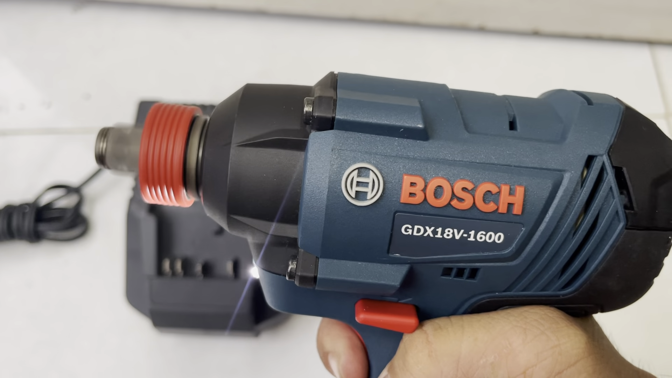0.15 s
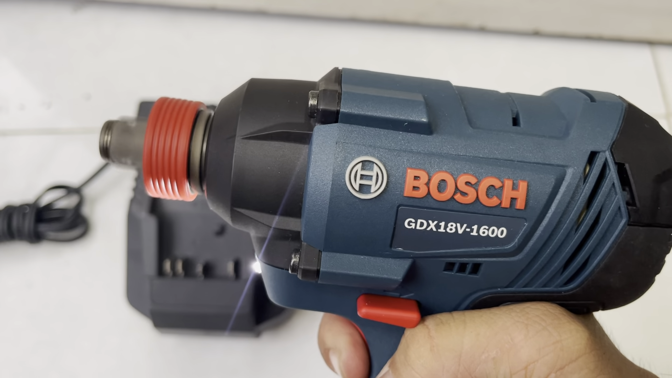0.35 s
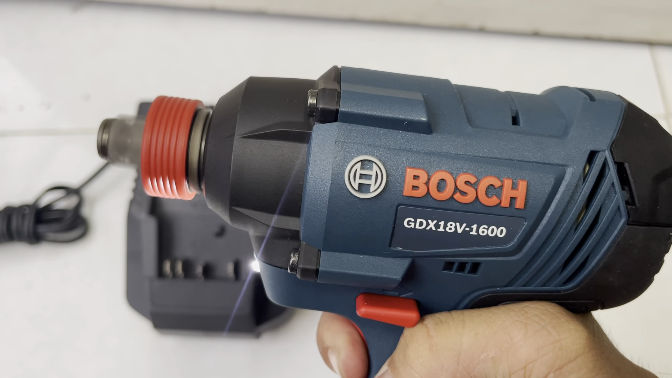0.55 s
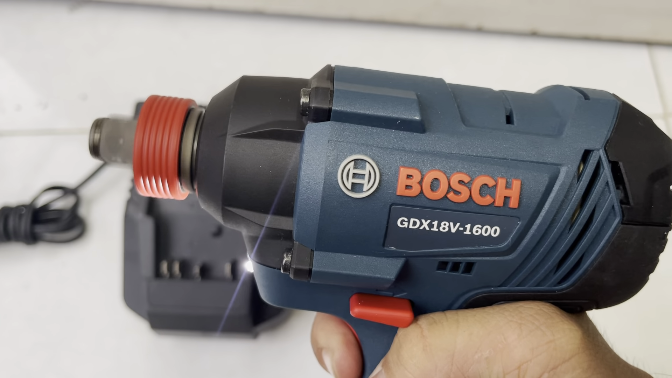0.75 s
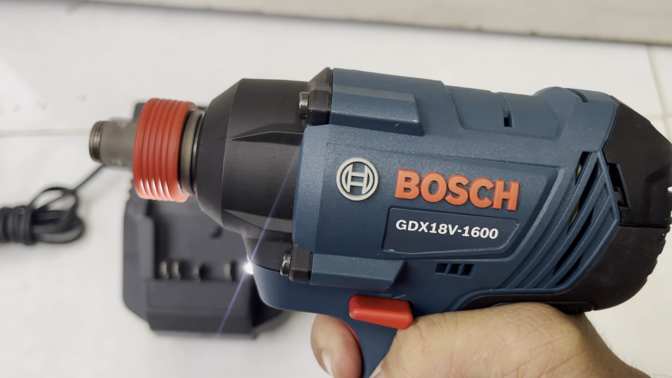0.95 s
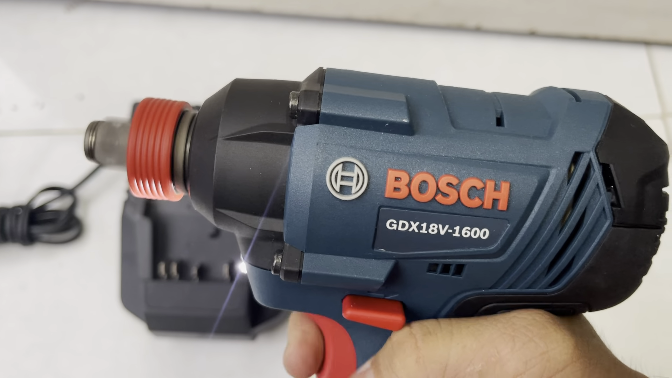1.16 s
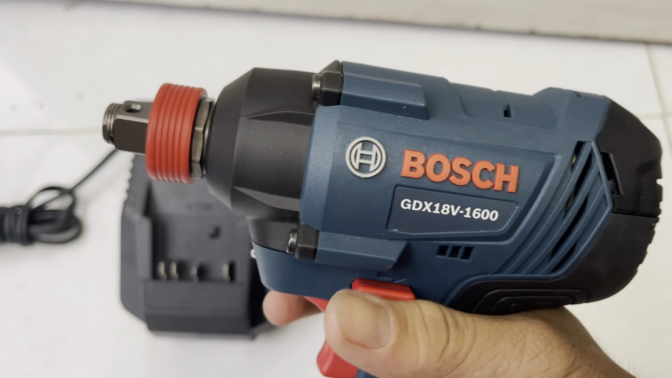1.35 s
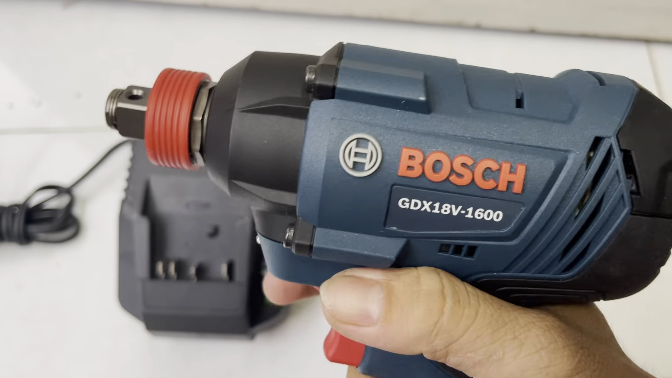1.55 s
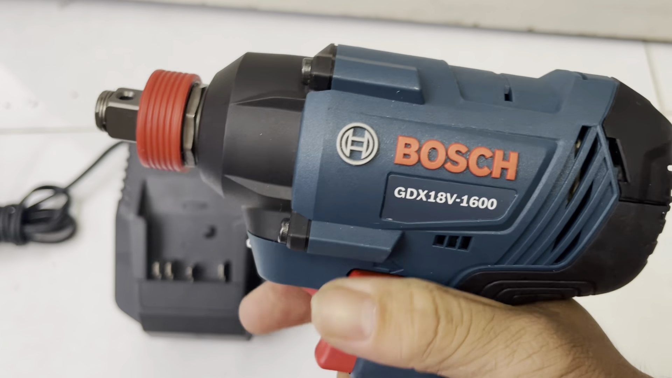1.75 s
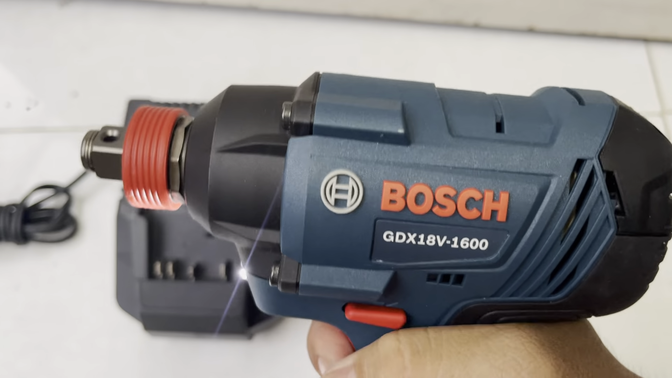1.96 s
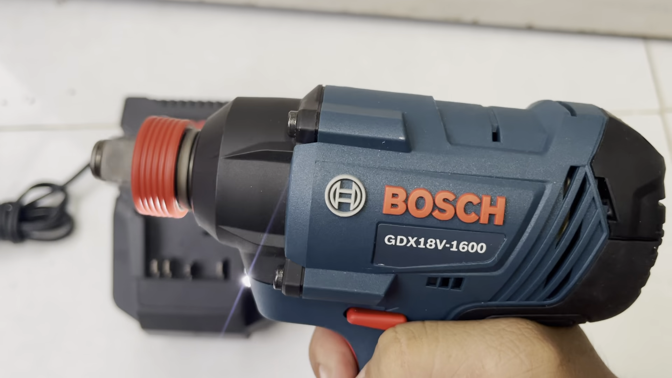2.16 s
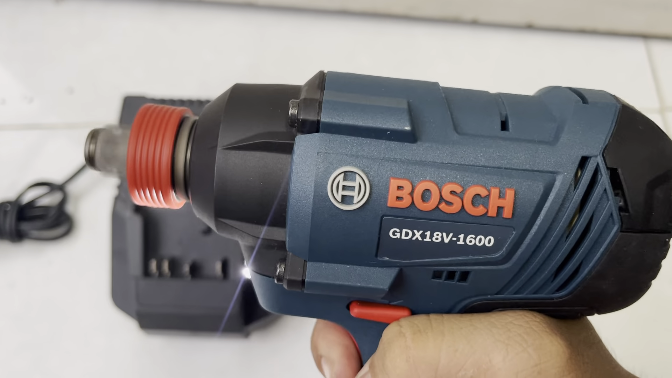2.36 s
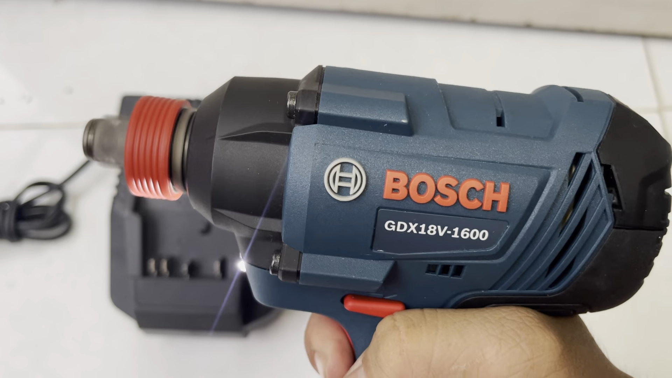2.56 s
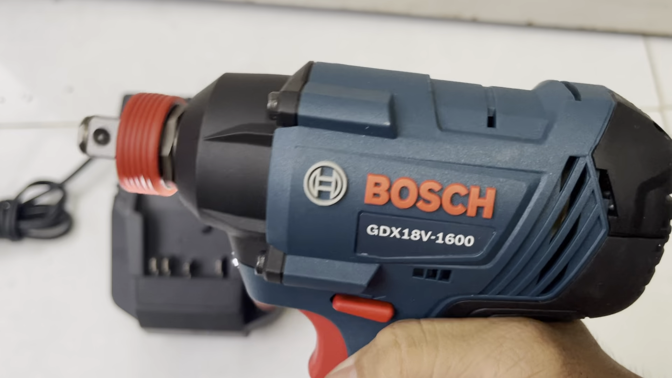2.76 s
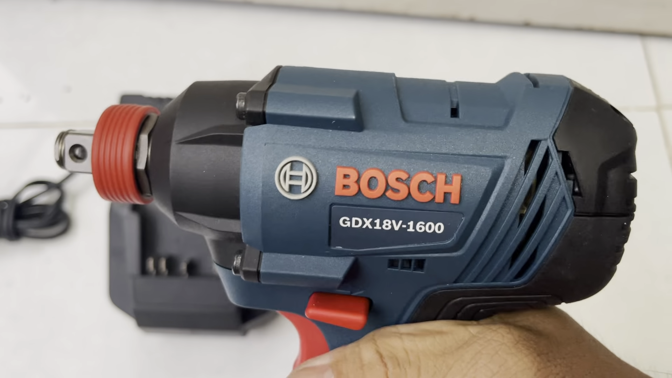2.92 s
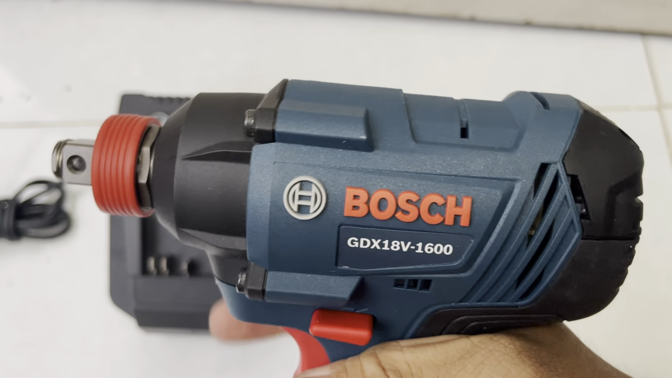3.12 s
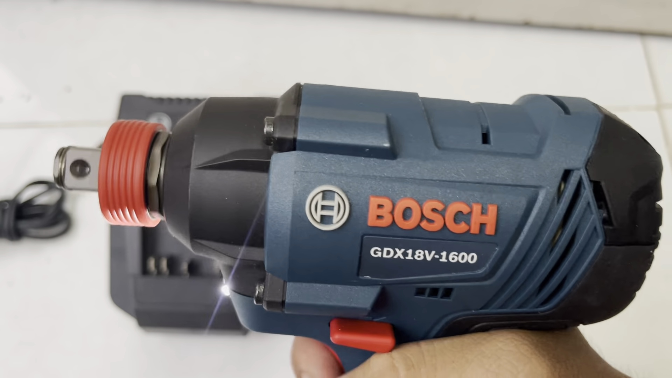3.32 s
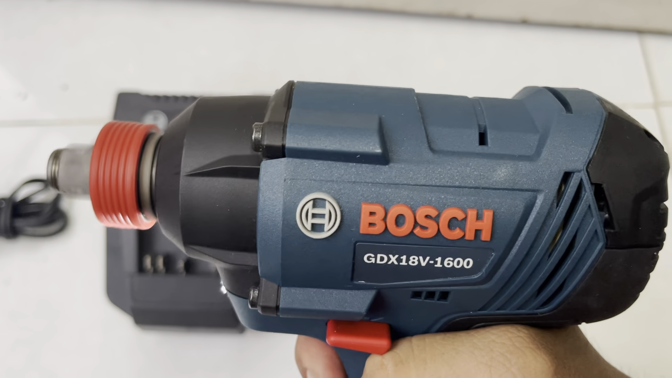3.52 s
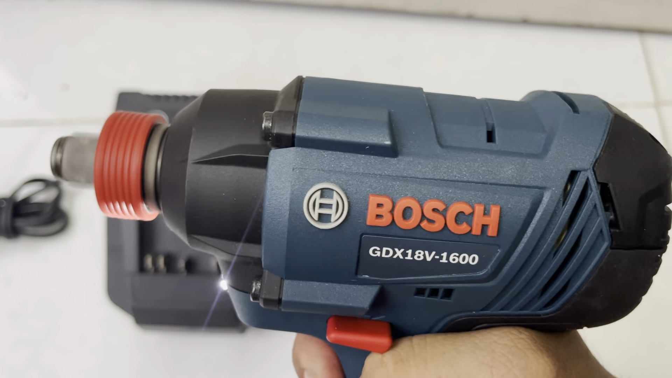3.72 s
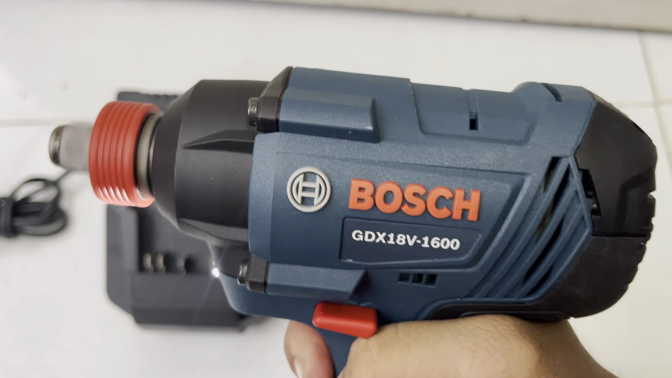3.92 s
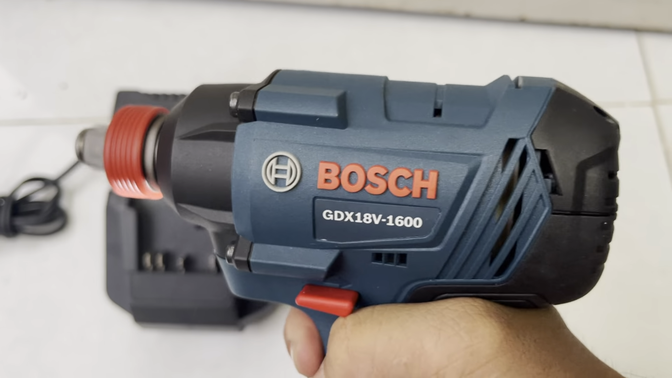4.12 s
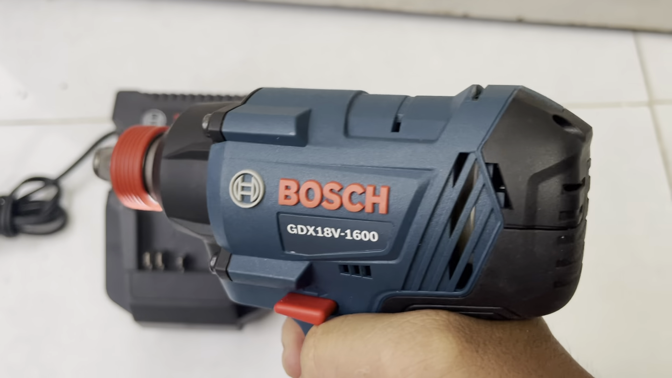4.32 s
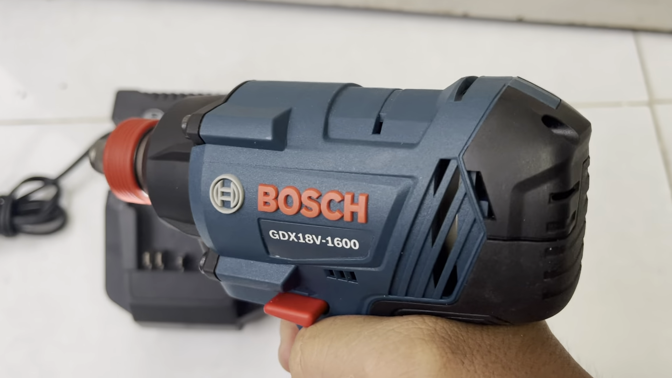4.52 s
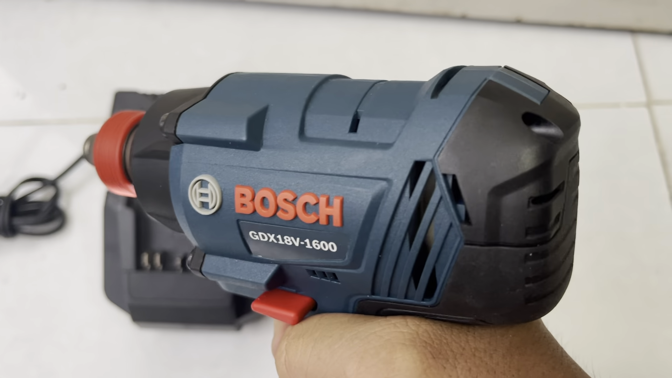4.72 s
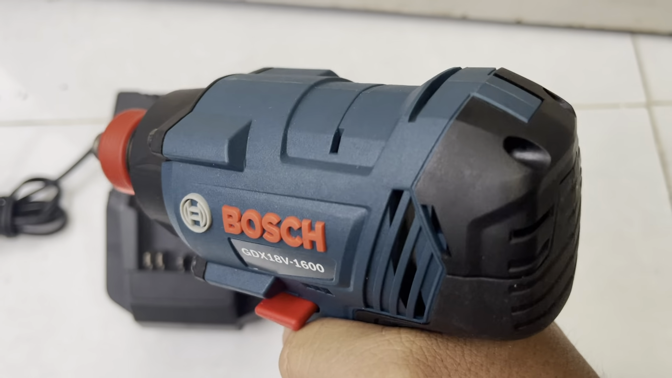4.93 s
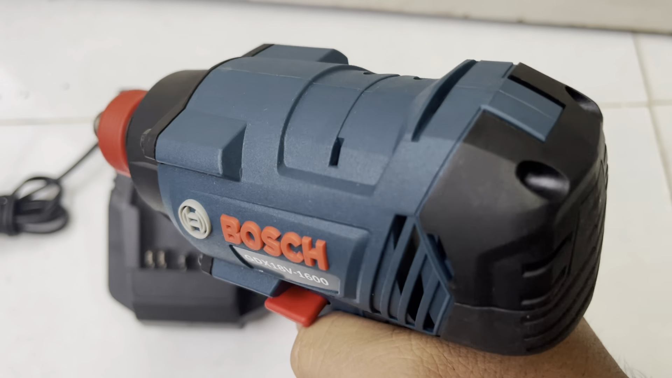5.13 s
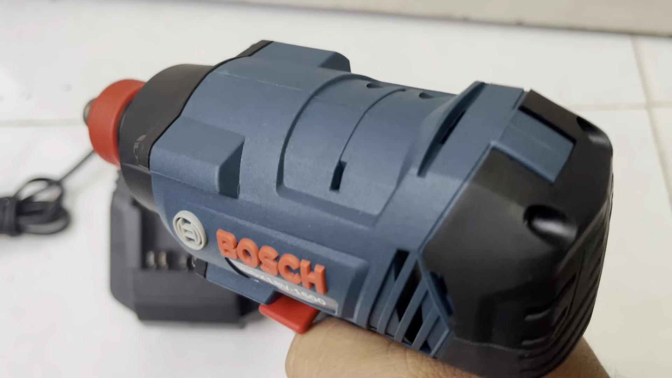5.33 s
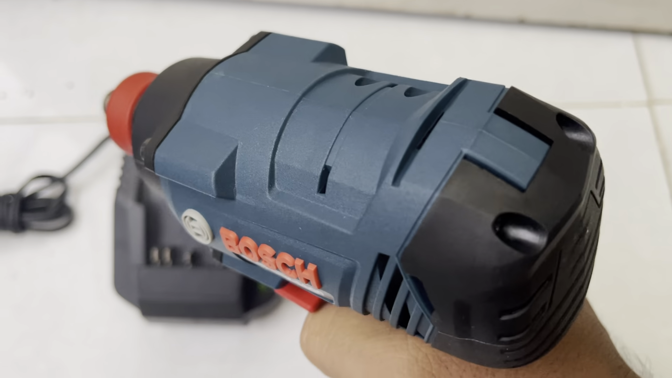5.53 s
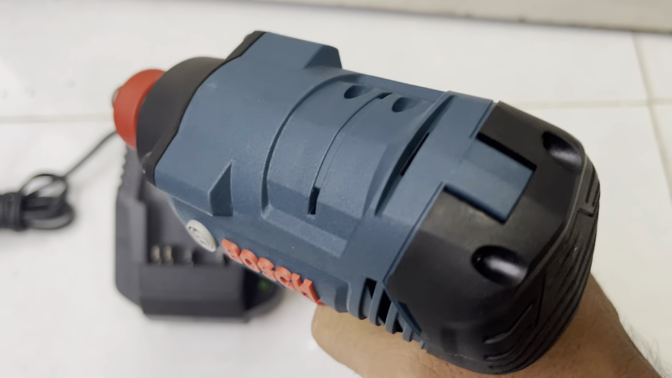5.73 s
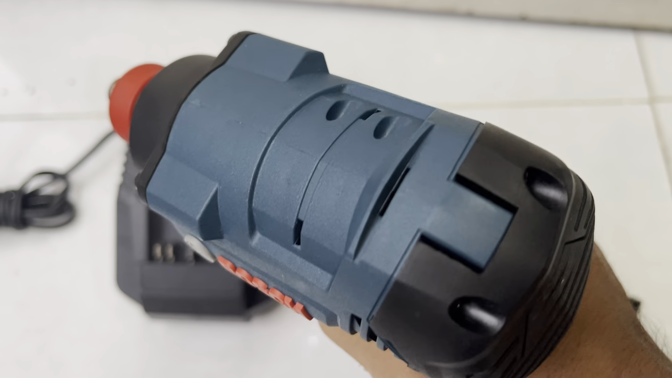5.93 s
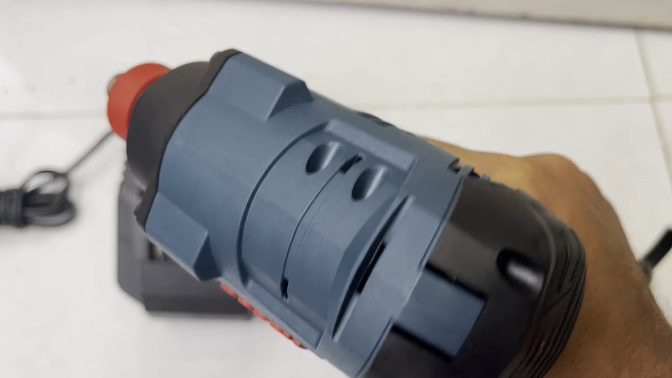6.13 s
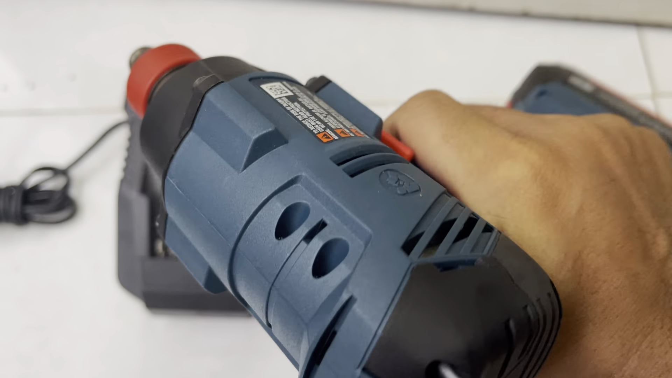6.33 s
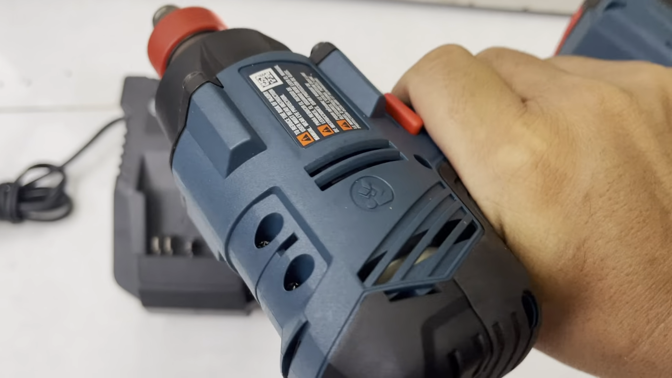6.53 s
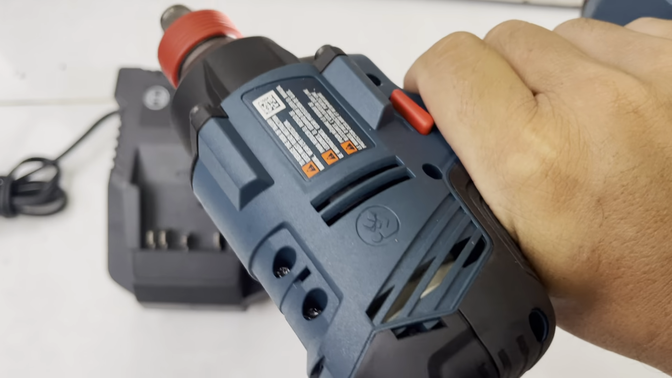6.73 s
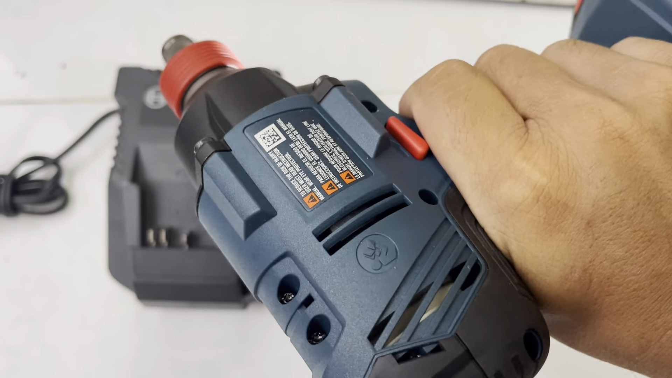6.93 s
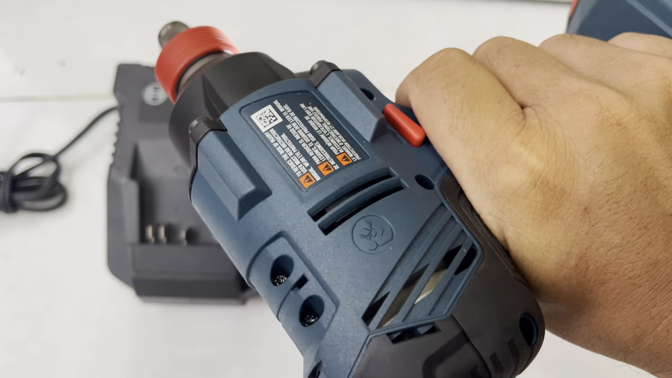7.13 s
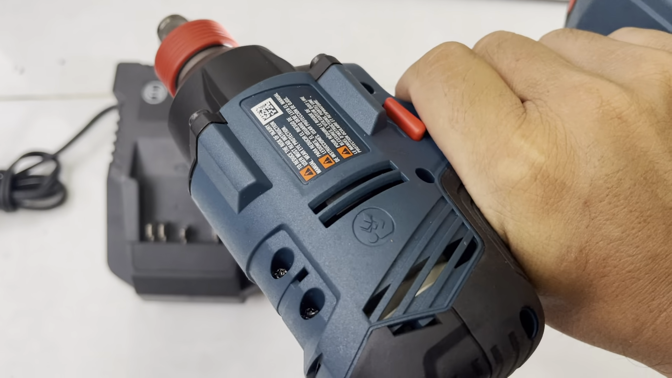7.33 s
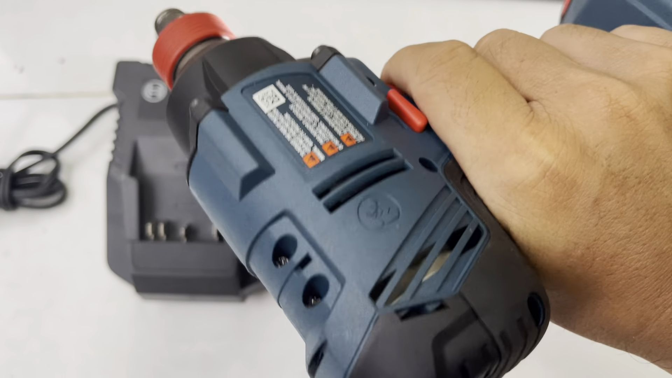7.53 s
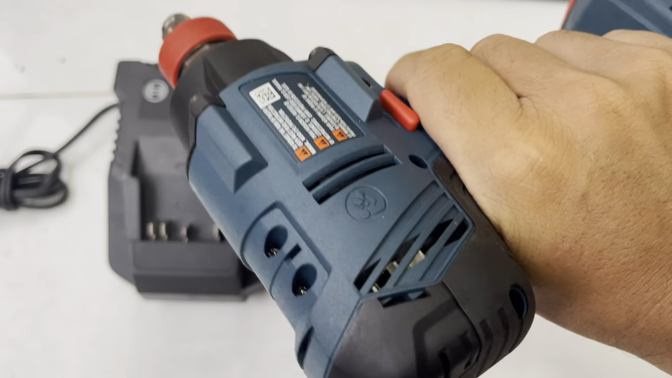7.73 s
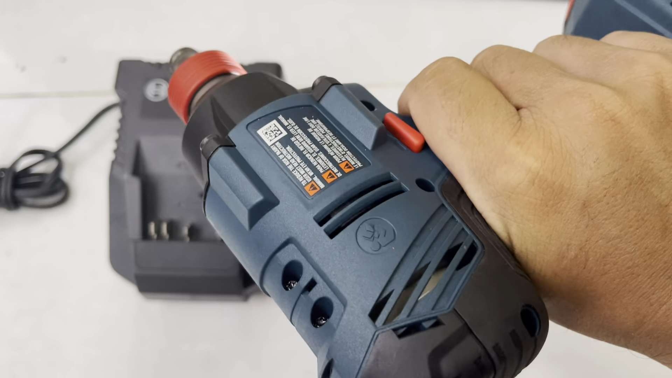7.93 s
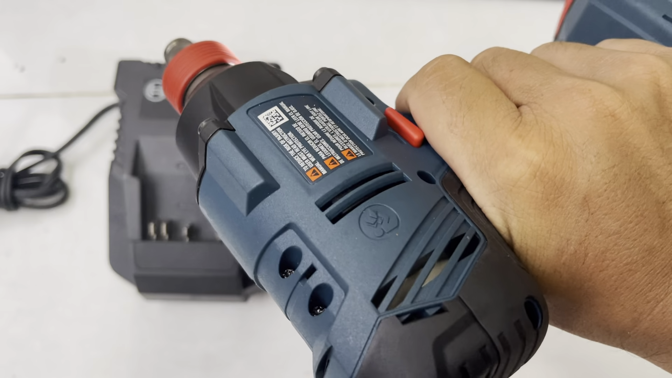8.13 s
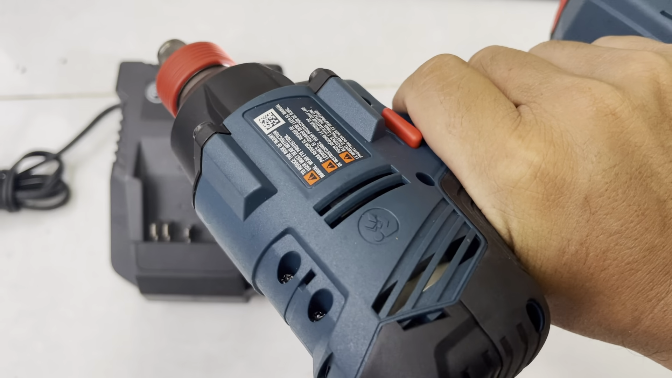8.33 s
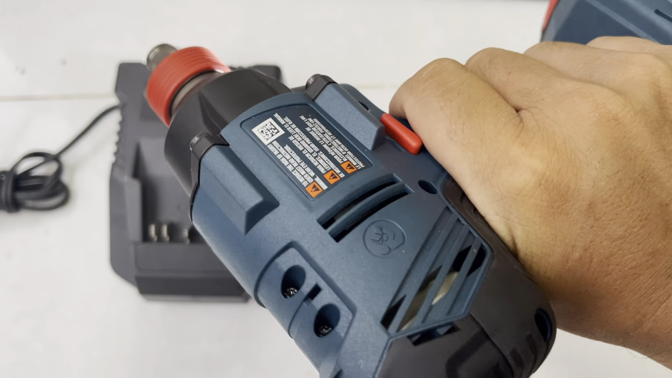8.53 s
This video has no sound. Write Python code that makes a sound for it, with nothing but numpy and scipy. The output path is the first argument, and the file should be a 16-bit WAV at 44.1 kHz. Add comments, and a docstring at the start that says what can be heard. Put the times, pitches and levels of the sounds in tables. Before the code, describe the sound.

A cordless impact driver whines unloaded close by in four trigger pulls, stopping dead between them with sharp switch clicks, in a hard tiled room.

```python
"""Tiled room: a cordless impact driver spins free close by in four trigger pulls, the second in reverse.
Planet gears and commutator whine as sines locked to the shaft, over filtered brush and fan noise.
The brake stops it dead; switches click between pulls as noise bursts through shell resonances.
The vents blow gusts on the microphone: rumble and chirped puffs. A distant machine hums and winds down."""
import sys
import numpy as np
from scipy import signal
from scipy.fft import rfft, irfft
from scipy.io import wavfile
from scipy.ndimage import uniform_filter1d

SR = 44100
rng = np.random.default_rng(int(sys.argv[2]) if len(sys.argv) > 2 else 0)


def ratio_of_db(decibels):
    """Turn decibels (scalar or array-like) into linear amplitude factors; 0 dB maps to 1."""
    return 10 ** (np.asarray(decibels, float) / 20)


def wav_out(sig):
    """Save sig, one row per channel (or a flat mono array), as 16-bit PCM at SR to the path in sys.argv[1]."""
    wavfile.write(sys.argv[1], SR, np.round(np.clip(np.atleast_2d(sig).T, -1, 1) * 32767).astype(np.int16))


N = 382347
T = np.arange(N) / SR


def shape(x, points):
    """Filter x by (Hz, dB) points joined on a log axis, -120 dB outside."""
    hz, db = np.transpose(points)
    f = np.maximum(np.fft.rfftfreq(N, 1 / SR), 1)
    gain = ratio_of_db(np.interp(np.log(f), np.log(hz), db, -120, -120))
    return irfft(rfft(x) * gain, N)


def noise(points):
    """Coloured noise of rms 1."""
    x = shape(rng.standard_normal(N), points)
    return x / x.std()


def resonate(x, hz, width_hz):
    """Two-pole resonance, gain 1 at its centre."""
    return signal.lfilter(*signal.iirpeak(hz, hz / width_hz, SR), x)


def walk(rate_hz):
    """Smooth random curve of spread 1, changing about rate_hz times a second."""
    k = int(SR / rate_hz)
    steps = np.repeat(rng.standard_normal(N // k + 1), k)
    x = uniform_filter1d(uniform_filter1d(steps, k), k)[:N]
    return x / x.std()


def curve(table):
    """Columns of a table, interpolated over time in its first column."""
    s, *columns = np.transpose(table)
    return [np.interp(T, s, c) for c in columns]


def by_direction(forward, reverse):
    """Value over time for the direction the switch is set to."""
    # Reverse setting of the switch: start in seconds, end in seconds.
    reverse_s = (1.55, 2.97)
    back = (T > reverse_s[0]) & (T < reverse_s[1])
    return np.where(back, reverse, forward)


def geared(table):
    """(multiple, dB over time) from rows of multiple, dB forward, dB in reverse."""
    return [(k, by_direction(forward_db, reverse_db)) for k, forward_db, reverse_db in table]


def tones(turns, table, waver_db, rate_hz):
    """Sines on multiples of a rotation, each wavering alone."""
    total = 0
    for k, db in table:
        level = np.sqrt(2) * ratio_of_db(db + waver_db * walk(rate_hz))
        total = total + level * np.sin(2 * np.pi * (k * turns + rng.random()))
    return total


def trigger(brake_bite_s):
    """Shaft Hz: a ramp bending over to full speed, then the brake; also seconds since the last release."""
    # Trigger pulls. Each row: start in seconds, release in seconds, shaft Hz at release,
    # creep in Hz per second, run-up in Hz per second.
    pulls = [(-.5, 1.2095, 315.4, 3.6, 1600), (1.967, 2.748, 284.3, 3, 1700),
             (3.372, 7.541, 318.3, .65, 1630), (7.842, 9, 319.3, 4, 1700)]
    knee = 7  # sharpness of the bend
    brake_hz_per_s = 5200
    hz, since_s = np.ones(N), np.zeros(N)
    for start_s, release_s, top_hz, creep, ramp in pulls:
        full = top_hz - creep * np.maximum(release_s - T, 0)
        rise = ramp * np.maximum(T - start_s, 1e-6)
        after = np.maximum(T - release_s, 0)
        run = (full ** -knee + rise ** -knee) ** (-1 / knee)
        run = run - brake_hz_per_s * after ** 2 / (after + brake_bite_s)
        hz = np.maximum(hz, run)
        since_s = np.where(T > start_s, after, since_s)
    return hz, since_s


def layers(speed, since_s, brake_bite_s):
    """Gain of each motor layer from direction, grip, speed and brake."""
    # Layers of the motor by name. Each row: level forward in dB, level in reverse in dB,
    # change when turned away in dB, power of speed, change under the brake in dB.
    layer_rows = dict( above=(0.8, 1, 2.1, 2.5, -30), below=(-0.5, 1, .1, 3.5, -17),
                  armature=(-33, -35, -17, 4, -8), commutator=(-38.5, -48, -10, 11, -8),
                  strain=(0, 0, 0, .3, 0), dive=(0, 0, 0, .5, 0), brushes=(-45.5, -34.5, 4.5, 10.5, -4),
                  squeal=(4, 5, -7, -2.7, -2), vent=(-29, -29, -0.4, 1.2, 0.5),
                  rasp=(-37.5, -37.5, -2.5, .93, -2), box=(-31, -31, -4.5, 1.08, 0.5),
                  housing=(-43.5, -42.5, 4, 1.4, -4))
    # The tool in the hand. Each row: time in seconds, level in dB, turn away (0 = none, 1 = reference),
    # upper gear tone in dB, lower gear tone in dB.
    held = [(0, 0.3, 0.06, -20, -37), (.3, 1.3, 0.16, -21, -32), (.47, -2.5, 0.1, -20, -45),
            (1.2, -3, 0.17, -20.5, -30), (2.2, -0.4, 0, -35, -29.5), (2.75, 0.6, 0, -34, -30),
            (3.6, 1.9, 0.02, -23, -30.5), (4.04, 2.5, 0.07, -22.5, -35), (4.23, -2.5, 0, -22, -49),
            (4.45, -1.4, 0.21, -25.5, -35), (4.9, -0.55, 0.17, -23, -36), (5.2, -0.14, .4, -24.5, -43),
            (5.75, -0.5, 0.6, -36.5, -44), (6.15, -0.8, 0.97, -46, -34.5), (6.35, -1.5, 1.2, -42.5, -37),
            (6.6, -1.5, 1.1, -31, -33), (7, -1.5, 0.8, -38.5, -36), (7.5, -1, 0.94, -39, -37),
            (8.1, -0.3, 0.75, -35.5, -32.5), (8.67, -0.2, 0.53, -38.5, -34.5)]
    level_db, away, above_db, below_db = curve(held)
    braked = 1 - np.exp(-(since_s / (2 * brake_bite_s)) ** 2)
    gain = {}
    for name, (forward_db, reverse_db, away_db, power, brake_db) in layer_rows.items():
        db = by_direction(forward_db, reverse_db) + level_db + away_db * away + brake_db * braked
        gain[name] = ratio_of_db(db) * speed ** power * (speed > .03)
    gain["above"] = gain["above"] * ratio_of_db(above_db)
    gain["below"] = gain["below"] * ratio_of_db(below_db)
    # the squeal peaks once, squeal_s after release
    squeal_s = .005
    gain["squeal"] = gain["squeal"] * (since_s / squeal_s * np.exp(1 - since_s / squeal_s)) ** 2
    # strain while speed climbs, dive while it falls; silent until the shaft is well under way
    change = np.gradient(speed) * SR / 2.5 * np.clip((speed - .29) / .1, 0, 1)
    gain["strain"] = gain["strain"] * np.clip(change, 0, 1)
    gain["dive"] = gain["dive"] * np.clip(-change, 0, 1)
    return gain


def motor():
    """Gear and motor tones follow the shaft; the noises grow with speed and throb with the rotation."""
    # Side tones of the gear mesh. Each row: carrier turns from mesh, level re the two main tones in dB.
    side_tones = [(-1, -14.5), (6, -21), (2, -26.5), (3, -16), (8, -44), (8, -37)]
    # Armature tones. Each row: multiple of shaft rate, level forward in dB, level in reverse in dB.
    armature = [(5, 0.5, 2.5), (2, -11.5, -20), (10, -25, -1), (11, -23, -29)]
    # Commutator tones. Each row: multiple of shaft rate, level forward in dB, level in reverse in dB.
    commutator = [(20.03, 1.5, -9), (10, 0.5, -19), (14.93, -8, -10), (18, -17, 1), (24.84, -9, -14),
                  (21.1, -21, 8)]
    # Brush tones. Each row: multiple of shaft rate, level forward in dB, level in reverse in dB.
    brushes = [(28.9, -3, 0), (30.05, 1.5, -11), (30.95, -5, 4.5), (28, -1.5, -16), (34, -2.5, -16),
               (35, 2, -16), (35.7, -14, -14), (38.7, -12, -3), (40, -10, -7), (40.7, -18, -11)]
    # Tones under heavy current while the speed climbs. Each row: multiple of shaft rate,
    # level forward in dB, level in reverse in dB.
    strain = [(20, -50, -38), (31, -46, -58), (7.6, -45, -44), (12, -55, -47)]
    # Tones under the brake while the speed falls. Each row: multiple of shaft rate,
    # level forward in dB, level in reverse in dB.
    dive = [(7.6, -50, -33), (20, -60, -54)]
    # Brush squeal as the brake bites. Each row: multiple of shaft rate,
    # level forward in dB, level in reverse in dB.
    squeal = [(29, -29, -41), (37, -25, -45), (35, -34, -45)]
    # Unbalance of the shaft. Each row: multiple of shaft rate, level forward in dB, level in reverse in dB.
    unbalance = [(1, -21, -25.5), (2, -16, -25)]
    # Colour of the vent hiss. Each row: frequency in Hz, relative level in dB.
    vent_colour = [(5800, -36), (6500, -16), (7500, -6.5), (9000, -4), (10300, 0.5), (11500, -4),
                   (12700, -13), (13200, -11)]
    # Colour of the rasp. Each row: frequency in Hz, relative level in dB.
    rasp_colour = [(3000, -13), (3500, -3), (4100, -8.5), (4900, -3.5), (5600, -4.5), (6500, -5.5),
                   (7500, -27)]
    # Colour of the gearbox whirr. Each row: frequency in Hz, relative level in dB.
    gearbox_colour = [(200, -16), (450, -11), (750, -6), (1000, -1), (1400, -4.5), (1800, -2), (2450, 2.5),
                      (3100, -1), (3800, -10.5)]
    # Resonances of the plastic housing. Each row: centre in Hz, width in Hz, level in dB.
    housing = [(1419, 152, 4), (2440, 110, -8)]

    sun, ring_gear = 9, 55  # teeth
    brake_bite_s, flutter_db = .008, 3
    hz, since_s = trigger(brake_bite_s)
    speed = hz / hz.max()
    g = layers(speed, since_s, brake_bite_s)
    shaft = np.cumsum(hz * (1 + 0.000606 * walk(30))) / SR
    carrier = shaft * sun / (sun + ring_gear)

    # two planets push in turn, so the tones beside the mesh order beat the mesh itself
    gears = g["above"] * tones(carrier, [(ring_gear + 1, 0)], waver_db=-1.26, rate_hz=79)
    gears *= 1 + 0.24 * np.cos(2 * np.pi * carrier)  # this tone swells once a carrier turn
    gears += g["below"] * tones(carrier, [(ring_gear - 1, 0)], waver_db=0.5, rate_hz=36)
    both = np.hypot(g["above"], g["below"])
    beside = [(ring_gear + k, db) for k, db in side_tones]
    gears += both * tones(carrier, beside, waver_db=3.0, rate_hz=13)

    whine = g["armature"] * tones(shaft, geared(armature), waver_db=1.0, rate_hz=50)
    whine += g["commutator"] * tones(shaft, geared(commutator), waver_db=1.1, rate_hz=15)
    whine += g["brushes"] * tones(shaft, geared(brushes), waver_db=4.0, rate_hz=8.3)
    whine += g["strain"] * tones(shaft, geared(strain), waver_db=flutter_db, rate_hz=45)
    whine += g["dive"] * tones(shaft, geared(dive), waver_db=flutter_db, rate_hz=60)
    whine += g["squeal"] * tones(shaft, geared(squeal), waver_db=0.0, rate_hz=110)

    throb = 1 + 0.11 * np.sin(2 * np.pi * carrier) + 0.094 * np.sin(4 * np.pi * carrier)
    hiss = g["vent"] * noise(vent_colour) * (1 + 0.14 * np.sin(2 * np.pi * shaft))
    rasp = g["rasp"] * noise(rasp_colour)
    whirr = g["box"] * noise(gearbox_colour) * throb
    whirr += g["box"] * speed * tones(shaft, geared(unbalance), waver_db=1.5, rate_hz=20)

    # tooth knocks ring the plastic housing at fixed pitches
    knocks = rng.standard_normal(N) * throb * g["housing"]
    ringing = np.zeros(N)
    for f, width, db in housing:
        narrow = resonate(resonate(knocks, f, width), f, 2 * width)
        ringing += ratio_of_db(db) * np.sqrt(SR / width / np.pi) * narrow
    # the second mesh harmonic is rough
    harmonic = [(2 * ring_gear - 2, -12), (2 * ring_gear, -10), (2 * ring_gear + 2, -12)]
    ringing += g["housing"] * tones(carrier, harmonic, waver_db=5.0, rate_hz=300)

    # gear and motor tones break up while the speed changes
    changing = np.minimum(np.abs(np.gradient(speed)) * SR / 2.5, 1)
    flutter = ratio_of_db(flutter_db * (walk(55) - .5) * changing)
    return (gears + whine) * flutter + hiss + rasp + whirr + ringing


def echo(x, near_db, near_s, far_db, t60_s):
    """Floor and hand scatter at once, walls later; each side gets its own mix, strongest in the low treble."""
    t = np.arange(SR // 2) / SR
    near = ratio_of_db(near_db) * np.exp(-t / near_s) / np.sqrt(near_s * SR)
    far = ratio_of_db(far_db - 60 * t / t60_s) / np.sqrt(t60_s * SR / 14) * (t > .006)
    tail = (near + far) * rng.standard_normal((2, len(t)))
    coloured = shape(x, [(30, -31), (2500, -9.5), (5500, 3.5), (7500, -3.5), (9500, -9.5), (16000, -17)])
    return signal.fftconvolve(coloured[None], tail)[:, :N]


def room():
    """Hum alike on both sides, bass nearly so, the rest partly unrelated; the hum swells, then sags once off."""
    # Room background. Each row: time in seconds, bass and hum setting in dB, rest setting in dB.
    background = [(0, -51, -47), (1.3, -59, -59.5), (2, -50.5, -48.5), (2.75, -50, -46.5),
                  (3, -50.5, -53.5), (3.4, -51, -46), (4, -50.5, -54), (6.05, -66, -45), (6.2, -63, -72),
                  (7.1, -59, -69), (7.6, -55, -57.5), (8.4, -51, -46)]
    # Colour of the bass. Each row: frequency in Hz, relative level in dB.
    bass_colour = [(20, -35.5), (40, -10), (70, -4), (130, 0), (250, -5), (400, -11.5)]
    # Colour of the rest. Each row: frequency in Hz, relative level in dB.
    rest_colour = [(200, -27), (350, 1.5), (700, -3), (1500, -6.5), (2800, -9), (4000, -20), (7000, -21.5),
                   (10500, -16), (12500, -21.5), (13200, -47.5)]
    hum_hz, hum_off_s, sag_hz_per_s, fade_db_per_s = 189, 7.62, 66, 15
    hum_re_bass_db, swell_s, swell_db = 2, 7.65, 5.5
    level_db, rest_db = curve(background)
    off_s = np.maximum(T - hum_off_s, 0)

    swell = swell_db * np.exp(-((T - swell_s) / .45) ** 2)
    hum_db = level_db + hum_re_bass_db + swell - fade_db_per_s * off_s + 2.4 * walk(18)
    hum_turns = np.cumsum(hum_hz - sag_hz_per_s * off_s + 3 * walk(20)) / SR
    hum = ratio_of_db(hum_db) * np.sqrt(2) * np.sin(2 * np.pi * hum_turns)

    rest = 0.5 * noise(rest_colour) + 0.62 * np.array([noise(rest_colour), noise(rest_colour)])
    bass = noise(bass_colour) + 0.11 * np.array([noise(bass_colour), noise(bass_colour)])
    return hum + ratio_of_db(level_db) * bass + ratio_of_db(rest_db + walk(9.3)) * rest


def clicks():
    """A short rattling blow rings the plastic shell; faint ticks of fingers on the grip fall at random."""
    # Switch, trigger and anvil clicks. Each row: start in seconds, peak of the high rings in dB,
    # peak of the low part re the high in dB, decay of the blow in ms.
    blows = [(1.212, -29.5, -4, 1.54), (1.2364, -38.5, 1, 1.5), (1.545, -31.5, -5, 3.2),
             (1.5524, -27.5, 2, 3.1), (1.7375, -42, -15, 1.1), (1.8061, -40.5, -18, 1.1),
             (1.921, -38, -3, 1.1), (1.8447, -39, -18.5, 1.1), (2.022, -2, -10, 1.24),
             (2.793, -20.5, -19, 1.7), (2.9652, -25.5, -5, 3.2), (3.3237, -36, -2, 0.97),
             (7.786, -44, -2.5, 3), (3.4335, -7.5, -17, 1.2), (3.436, -4, -12.5, 0.61),
             (7.8666, -17, -13, 4.1)]
    # Resonances of the shell, the first being the low ring. Each row: centre in Hz, width in Hz, level in dB.
    shell = [(2740, 840, 0), (5130, 1700, -0.5), (8970, 2300, 6), (10550, 630, 3)]
    # Thud: centre in Hz, width in Hz, level re the low ring in dB.
    thud = (1200, 1000, -8.5)
    ticks_per_s, tick_db, tick_spread_db, tick_low_db, tick_ms = 14, -49, 2.5, -14, 1.3
    out, t = np.zeros(N + 2048), np.arange(2048) / SR
    chance = rng.random((int(ticks_per_s * N / SR), 2))
    ticks = [(u * N / SR, tick_db - tick_spread_db * np.log(1 - v), tick_low_db, tick_ms) for u, v in chance]
    for s, db, low_db, ms in blows + ticks:
        decay = np.exp(-t * 1000 / ms) + .1 * np.exp(-t / .004)
        blow = rng.standard_normal(2048) * decay
        rings = [ratio_of_db(level_db) * resonate(blow, f, width) for f, width, level_db in shell]
        high = sum(rings[1:])
        low = rings[0] + ratio_of_db(thud[2]) * resonate(blow, *thud[:2])
        low = ratio_of_db(low_db) * low / np.abs(low).max()
        i = int(s * SR)
        out[i:i + 2048] += ratio_of_db(db) * (high / np.abs(high).max() + low)
    return out[:N]


def whistle():
    """The chopped supply sings in the windings until the switch bypasses it."""
    # Whistles before the trigger is fully in. Each row: start in seconds, end in seconds, peak in dB.
    spans = [(1.97, 2.022, -40), (3.375, 3.434, -42), (7.848, 7.93, -37)]
    whistle_hz = 9880
    gate = sum(ratio_of_db(db) * ((T > a) & (T < b)) for a, b, db in spans)
    return uniform_filter1d(gate, size=200) * np.sin(2 * np.pi * whistle_hz * T)


def draught():
    """Gusty rumble of air on the microphone; each puff starts sharp and sinks into the bass."""
    # Gusts from the vents. Each row: start in seconds, peak in seconds, end in seconds,
    # rumble in dB, puffs in dB.
    gusts = [(4.217, 4.33, 4.6, -45, -53), (4.473, 4.694, 4.796, -20.5, -26.5),
             (4.89, 5.015, 5.44, -64, -39), (5.218, 5.352, 5.4, -48, -36.5),
             (5.68, 5.819, 6.03, -41, -30.5)]
    # Strongest puffs, the first a dull knock at 4.16 s sounded the same way. Each row: start in seconds,
    # amplitude before decay in dB.
    strong_puffs = [(4.155, -28.5), (4.642, -27), (4.476, -24.5), (4.502, -24), (4.688, -35), (4.757, -20),
                    (4.809, -13.5), (5.009, -30), (5.325, -36), (5.64, -29), (5.675, -30), (5.773, -30),
                    (5.812, -29), (5.889, -30)]
    # Colour of the rumble. Each row: frequency in Hz, relative level in dB.
    rumble_colour = [(22, -38), (50, 5.5), (100, 1.5), (200, -4.5), (400, -11), (800, -42.5), (1200, -54)]
    edge_db, rise_db_per_s, fall_db_per_s = -5.5, 600, 95
    shapes = []
    for a, peak, b, *_ in gusts:
        inside_db = np.interp(T, [a, peak, b], [edge_db, 0, edge_db])
        before_db = rise_db_per_s * np.maximum(a - T, 0)
        after_db = fall_db_per_s * np.maximum(T - b, 0)
        shapes.append(ratio_of_db(inside_db - before_db - after_db))
    rumble_level, puff_level = ratio_of_db(np.array(gusts)[:, 3:]).T @ np.array(shapes)

    t = np.arange(3000) / SR
    puff = np.sin(2 * np.pi * (75 * t + 3.41 * (1 - np.exp(-t / 0.0042)))) * np.exp(-t / 0.018)
    starts = (rng.random(N) < 130 / SR) * rng.standard_normal(N) * puff_level  # about 130 per s
    for s, db in strong_puffs:
        starts[int(s * SR)] = ratio_of_db(db)
    rumble = rumble_level * ratio_of_db(2.9 * walk(30)) * noise(rumble_colour)
    return rumble + signal.fftconvolve(starts, puff)[:N]


def scene():
    """The tool near, its echo, the draught and the room."""
    tool = motor() + whistle() + clicks()
    reflected = echo(tool, near_db=-9.5, near_s=0.0057, far_db=-17.5, t60_s=0.37)
    return tool + reflected + draught() + room()


def band_limit(x):
    """A steep low-pass at the top of the band."""
    return signal.sosfilt(signal.butter(12, 13140, fs=SR, output="sos"), x)


def record(dry):
    """Two microphone ports differ in level and phase by frequency."""
    # Microphone pair; the phase turns past a full circle in the treble.
    # Each row: frequency in Hz, left minus right in dB, lead of left in radians.
    ports = [(100, -0.6, 0.38), (600, 0.6, 0.62), (1230, 0, 0.26), (2050, 2.5, 0.8), (2540, 6, 1.13),
             (3100, 1, 1), (4400, 1, 0.37), (5340, 1.5, 1.5), (6350, 3.5, -0.6), (7400, 0, 0.37),
             (7480, 2, 1.74), (9056, 0, -1.13), (12340, 0.5, -7), (13500, -0.5, -10)]
    hz, db, lead = np.transpose(ports)
    f = np.fft.rfftfreq(N, 1 / SR)
    # half the difference goes to each side
    half = ratio_of_db(np.interp(f, hz, db) / 2) * np.exp(.5j * np.interp(f, hz, lead))
    mix = irfft(rfft(dry) * np.array([half, 1 / half]), N)
    return band_limit(mix)


dry = scene()
out = record(dry)
wav_out(out)
```